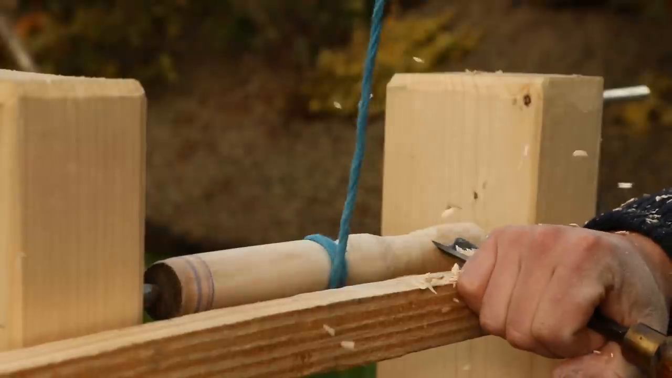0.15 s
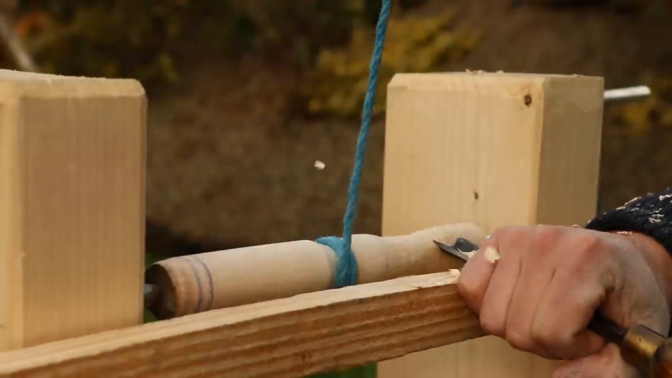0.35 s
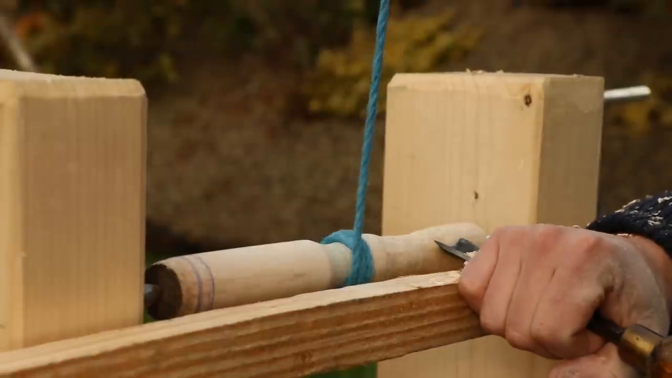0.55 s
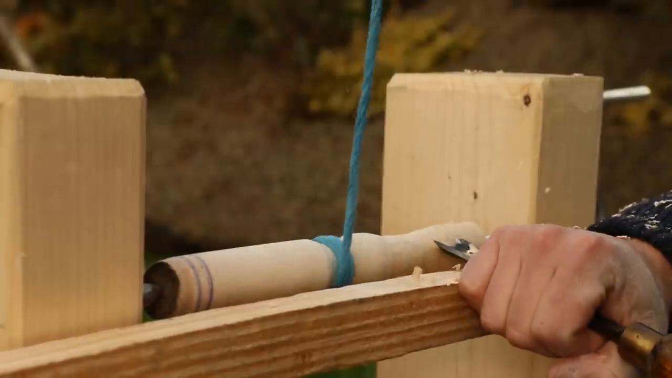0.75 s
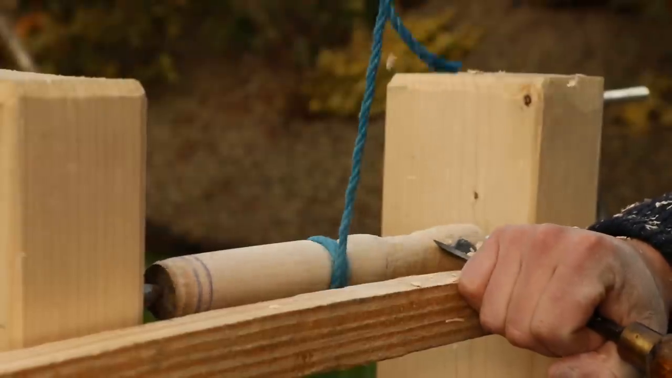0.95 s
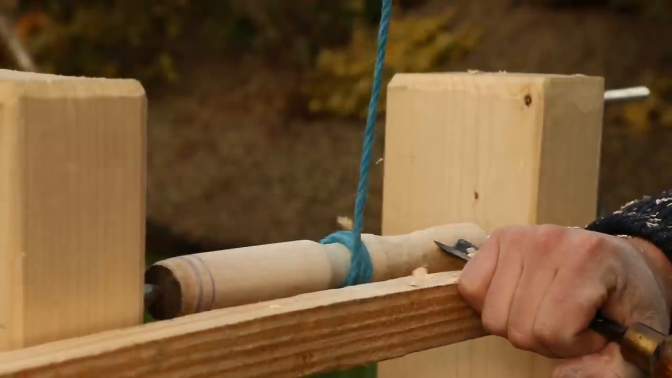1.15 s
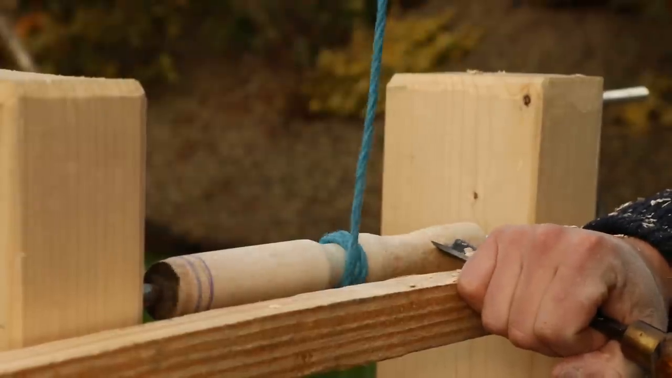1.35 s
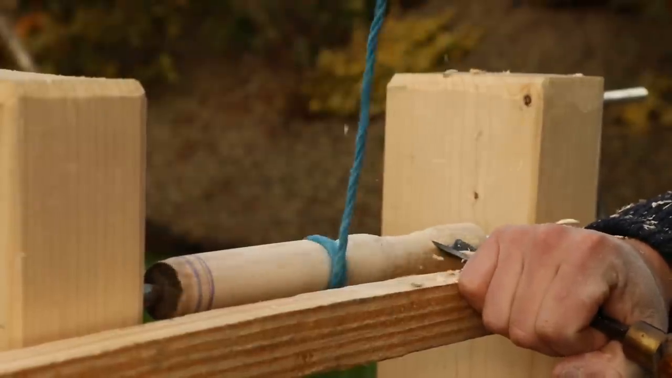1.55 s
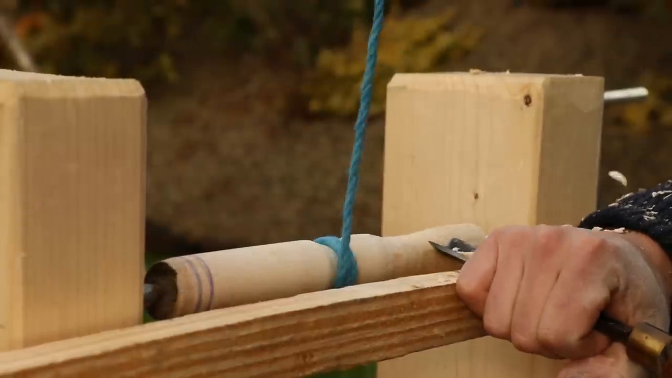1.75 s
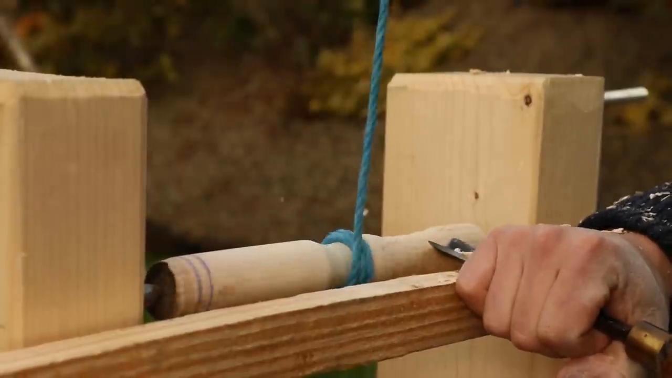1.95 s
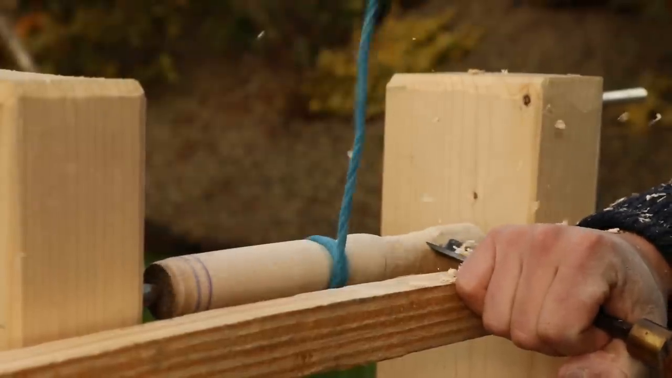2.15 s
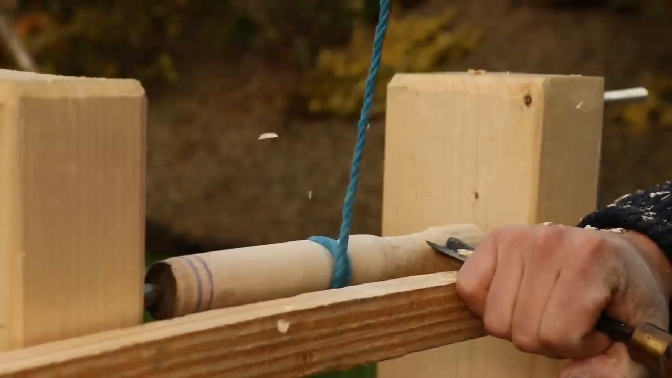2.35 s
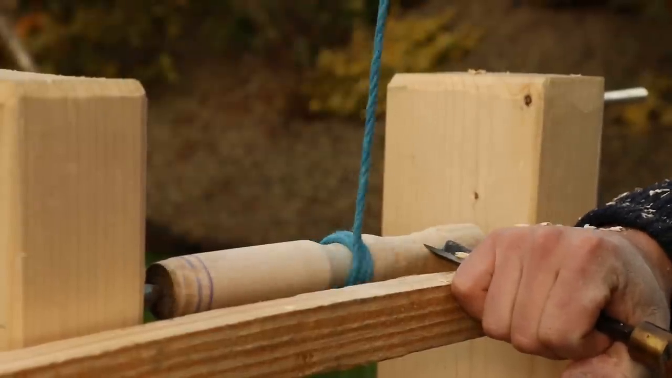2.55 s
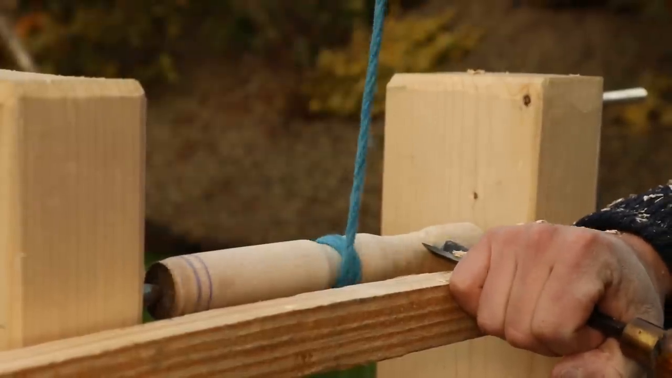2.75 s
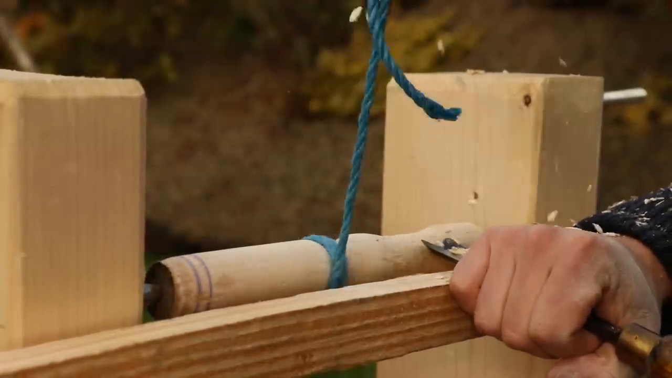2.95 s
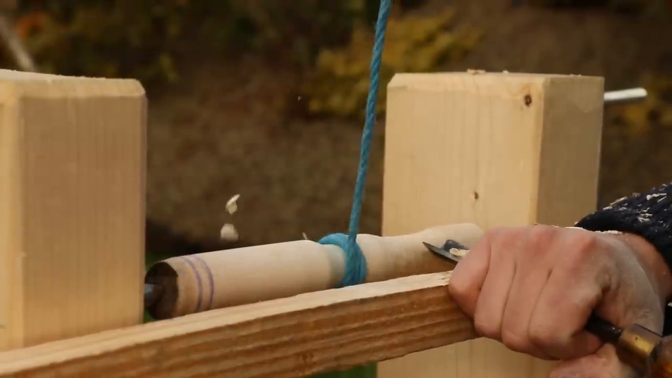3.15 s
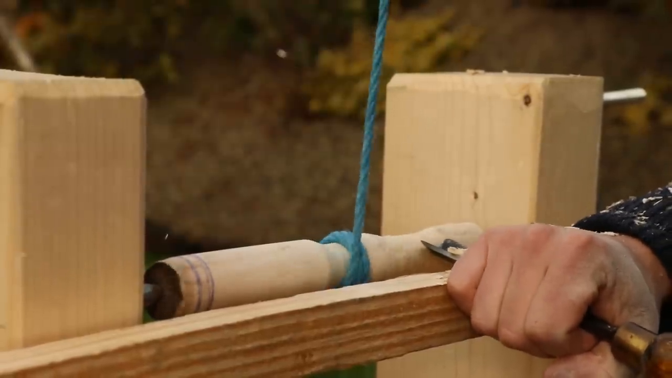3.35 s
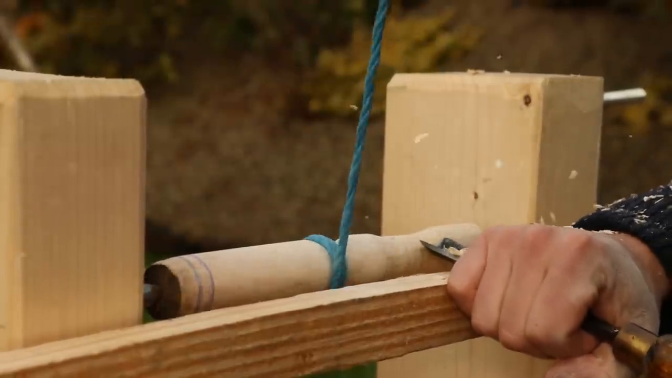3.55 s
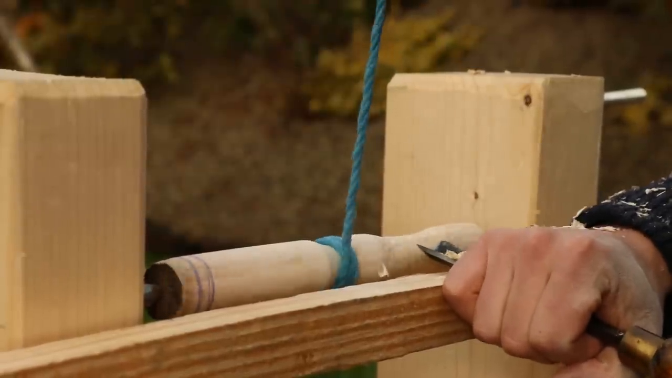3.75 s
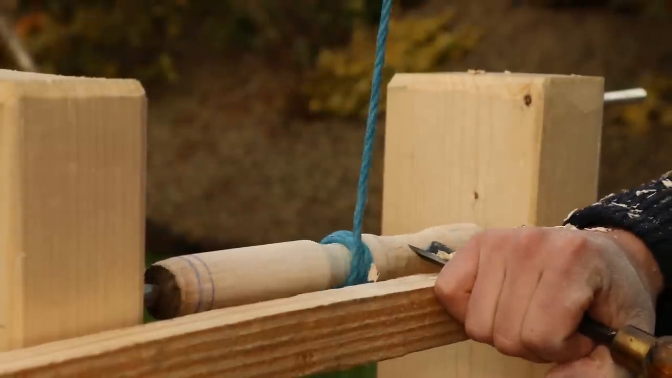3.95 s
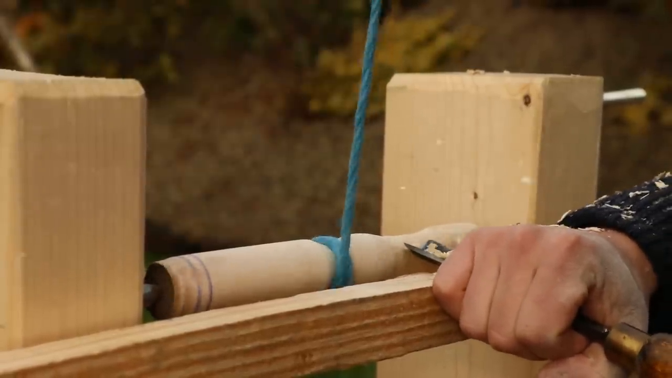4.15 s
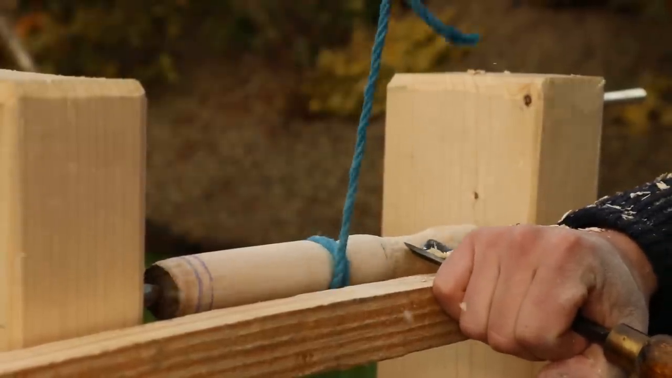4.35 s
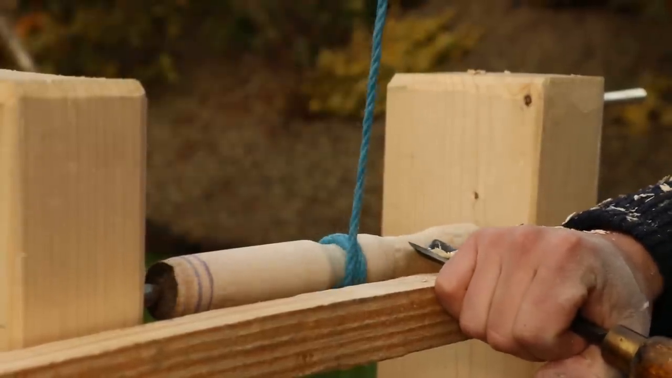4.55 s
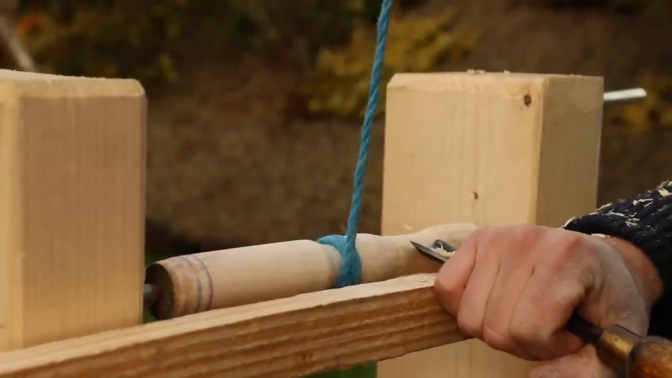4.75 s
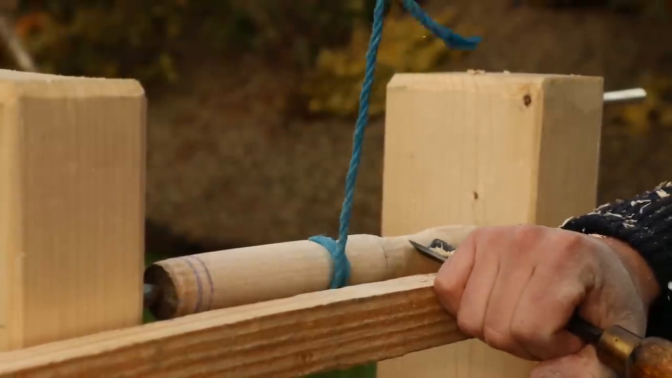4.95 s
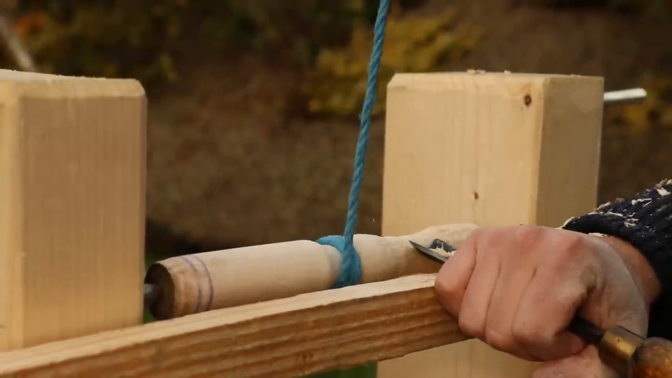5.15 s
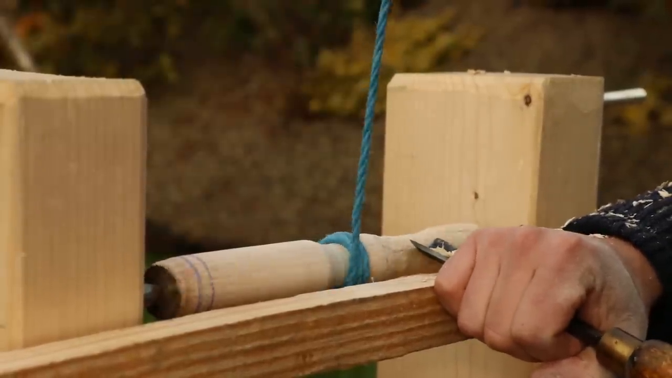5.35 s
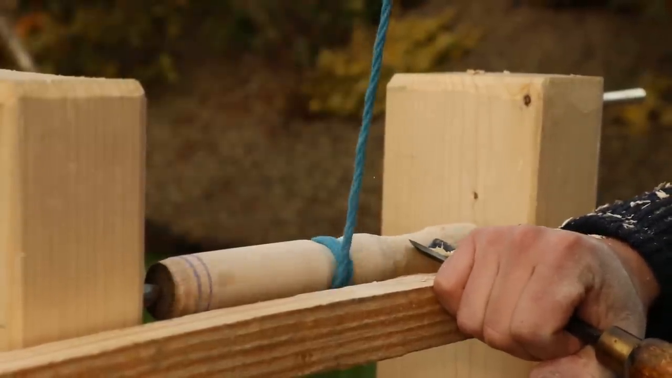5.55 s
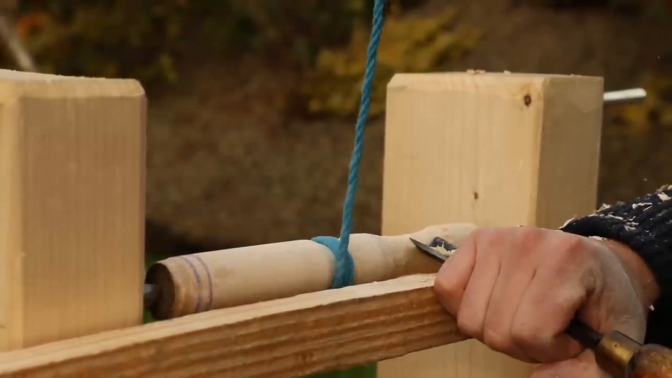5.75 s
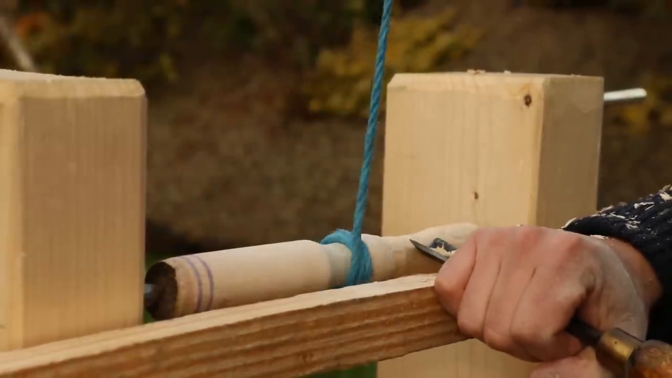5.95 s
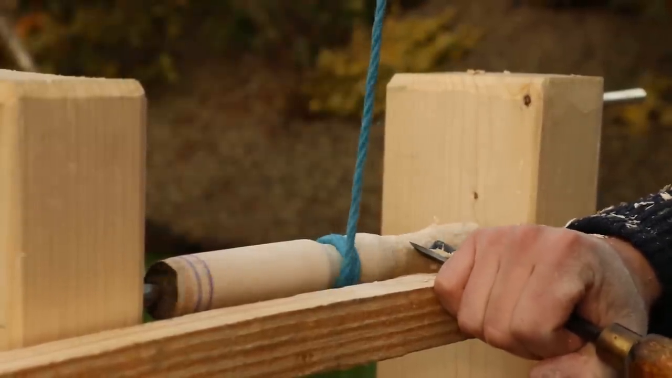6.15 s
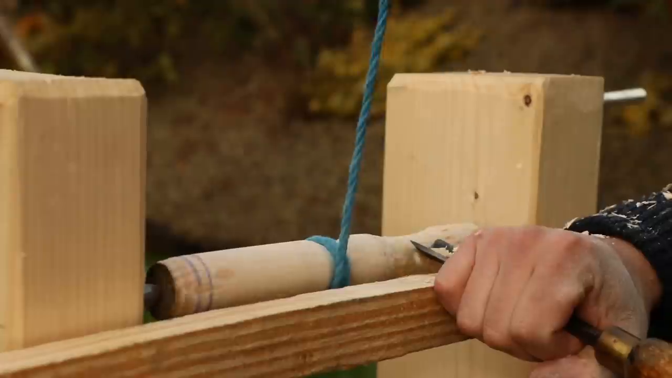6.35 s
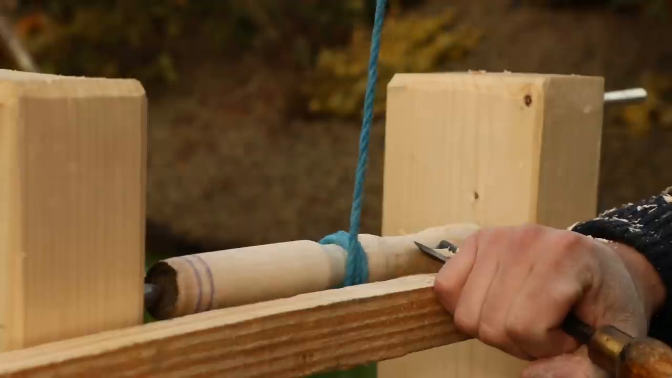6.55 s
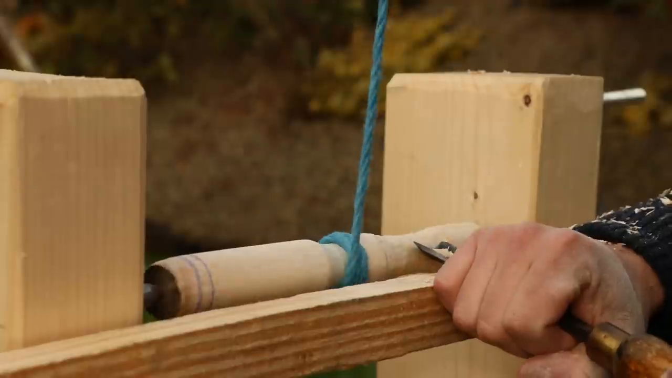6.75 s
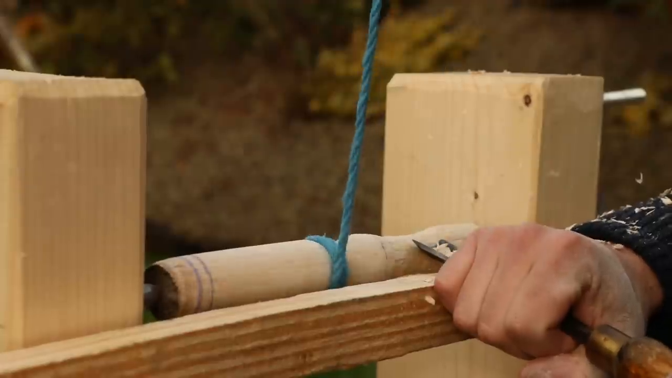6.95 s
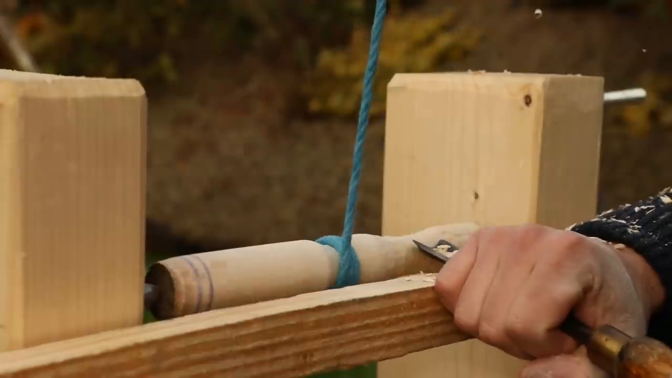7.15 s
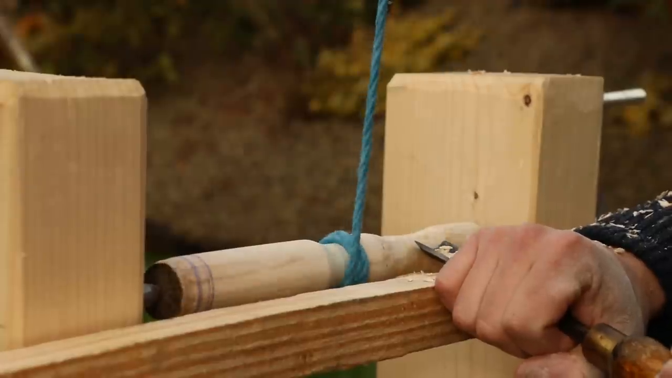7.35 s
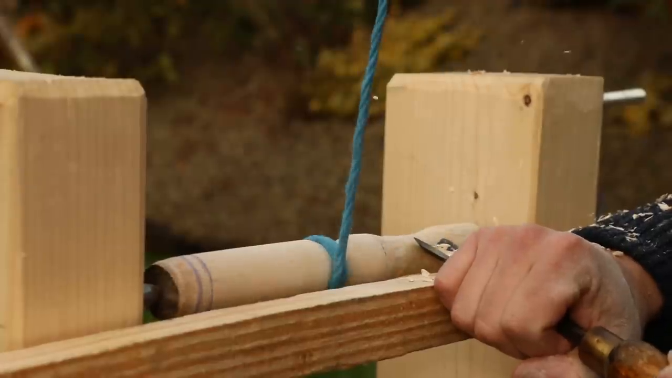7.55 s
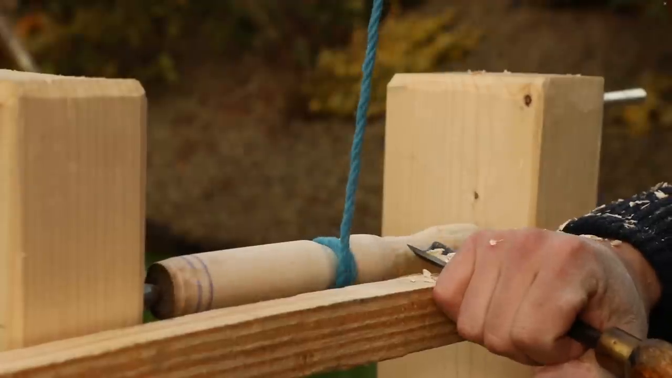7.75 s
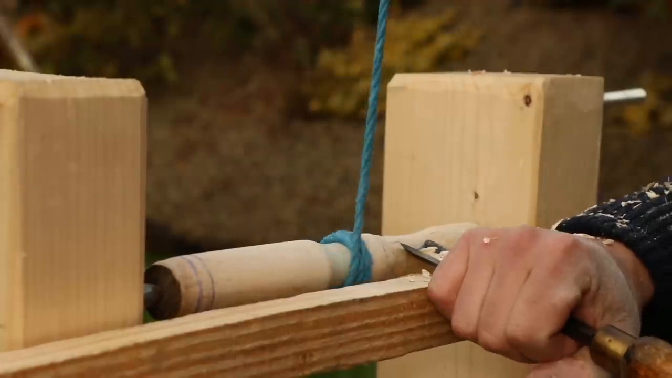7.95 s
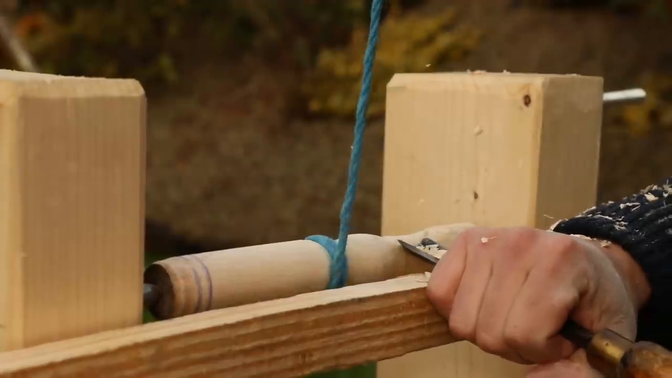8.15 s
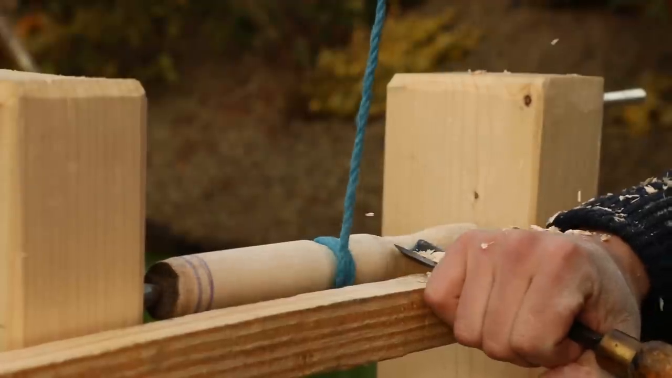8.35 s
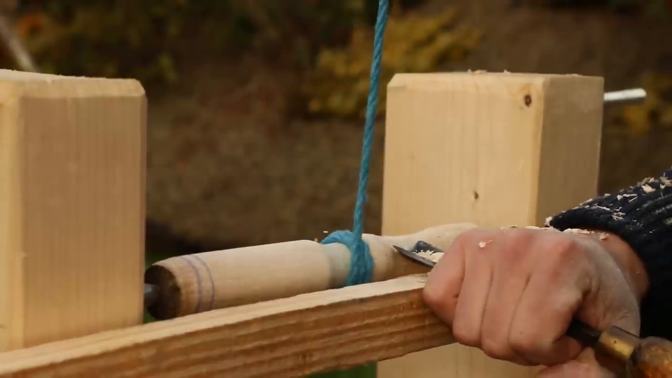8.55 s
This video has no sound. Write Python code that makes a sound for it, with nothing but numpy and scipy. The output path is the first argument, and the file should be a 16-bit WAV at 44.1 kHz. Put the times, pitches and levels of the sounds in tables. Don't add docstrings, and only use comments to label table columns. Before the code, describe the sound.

Close outdoors, a steel gouge cuts a wooden spindle driven back and forth by a cord. Every two-thirds of a second a harsh, grainy scrape bites with woody knocks and bright hissing chips, then stops abruptly. Between cuts the spindle runs back with a much quieter rumble, cord rustle and small bumps. Early strokes are strongest; middle ones thin to a hiss, later ones partly recover. Dry, almost echo-free, over faint air.

```python
import sys
import numpy as np
from scipy import signal
from scipy.fft import rfft, irfft
from scipy.io import wavfile

SR = 44100
rng = np.random.default_rng(int(sys.argv[2]) if len(sys.argv) > 2 else 0)


def invert_db(level):
    return 10 ** (np.asarray(level, dtype=float) / 20)


def materialize(psi):
    bounded = np.clip(np.atleast_2d(psi).T, -1, 1)
    quanta = np.round(bounded * 32767).astype(np.int16)
    wavfile.write(sys.argv[1], SR, quanta)


N = 378819

# last slip in s, slowing in s, nearness to rest,
# level in dB, fade in dB per earlier slip.
SLOWINGS = [
    (3.731, .012, 0.21, -36, 1),
    (4.4198, .014, 0.3, -33, .7),
    (5.7642, .015, 0.15, -31, .8),
    (5.026, .018, .7, -29, .5),
]
LIFT_S = 0.0011


def rms_one(x):
    return x / np.sqrt(np.mean(x ** 2) + 1e-20)


def in_time(rows):
    s, *columns = np.transpose(rows)
    return [np.interp(np.arange(N) / SR, s, c) for c in columns]


def drift(rate_hz):
    r = np.exp(-32 * np.pi * rate_hz / SR)
    noise = rng.standard_normal(N // 16 + 2002)
    slow = signal.lfilter([1], [1, -2 * r, r * r], noise)[2000:]
    return np.interp(np.arange(N) / 16, np.arange(len(slow)), rms_one(slow))


def body(force, modes, patchy_db, wander_db=0):
    probe = np.zeros(SR // 4)
    probe[0] = 1
    out = 0
    for k, (hz, width_hz, level_db) in enumerate(modes):
        r = np.exp(-np.pi * width_hz / SR)
        uneven = invert_db(patchy_db * drift(42.0) + wander_db * drift(2.5))
        fed = np.concatenate([probe, force * uneven + 1e-18])
        ringing = signal.lfilter([1, 0, -1], [1, -2 * r * np.cos(2 * np.pi * hz / SR), r * r], fed)
        out = out + (-1) ** k * invert_db(level_db) * (1 - r * r) / 2 * ringing
    return out[len(probe):] / np.sqrt(np.sum(out[:len(probe)] ** 2))


def fibres(per_s, spread_db, clumps):
    sizes = invert_db(spread_db * np.minimum(rng.exponential(1, N), 5)) * rng.choice([-1, 1], N)
    return rms_one(sizes * (rng.random(N) < per_s / SR) * clumps)


def bursts(start_s, level_db, rise_s, dying_s):
    starts = np.zeros(N)
    starts[[max(round((s - rise_s) * SR), 0) for s in start_s]] = invert_db(level_db)
    t = np.arange(SR // 8) / SR
    shape = (1 - np.exp(-t / rise_s)) * invert_db(-60 * t / dying_s)
    return np.abs(signal.fftconvolve(starts, shape)[:N])


def air():
    # frequency in Hz, density in dB per Hz.
    hush = np.array([(20, -16), (60, -19), (160, -7), (600, 3), (1600, -4), (2500, -22), (5000, -31),
                     (16000, -33)])
    hz = np.maximum(np.arange(N // 2 + 1) * SR / N, 1)
    colour = invert_db(np.interp(np.log(hz), np.log(hush[:, 0]), hush[:, 1]))
    return invert_db(-58.0) * rms_one(irfft(rfft(rng.standard_normal(N)) * colour, N))


def moving():
    # rubbing is back at s, length of the dip in s, depth in dB.
    rests = [(1.428, 0.016, -22), (1.545, 0.044, -15.5), (2.126, 0.032, -14), (2.83, 0.12, -8.5),
             (3.456, 0.055, -26), (4.156, 0.11, -6.5), (4.775, 0.078, -15), (5.51, 0.054, -8),
             (6.16, 0.042, -9), (6.828, 0.06, -9), (7.442, 0.024, -15), (7.785, 0.058, -16),
             (8.401, 0.028, -12)]
    t = np.arange(N) / SR
    dips_db = [np.interp(t, [s - span, s - span / 2, s - .002, s], [0, db, db, 0]) for s, span, db in rests]
    return invert_db(sum(dips_db))


def arch(start, top, end):
    return np.sin(np.pi / 2 * np.interp(np.arange(N) / SR, [start, top, end], [0, 1, 0]))


def contact():
    # start, fastest and stop in s, wood and edge hiss in dB.
    returns = [(-0.20, -0.032, 0.065, -48.5, -67), (0.37, 0.578, 0.74, -40.5, -61),
               (1.013, 1.214, 1.424, -41.5, -57.5), (1.675, 2.085, 2.41, -40.5, -58.5),
               (2.411, 2.594, 2.91, -44.5, -62), (3.06, 3.247, 3.58, -43.5, -59.5),
               (3.728, 3.925, 4.11, -43.5, -59.5), (4.424, 4.56, 4.76, -47, -63.5),
               (5.055, 5.164, 5.45, -46, -65), (5.765, 5.954, 6.15, -44.5, -61),
               (6.445, 6.557, 6.78, -43, -60), (7.058, 7.347, 7.4, -41.5, -63),
               (7.736, 7.967, 8.07, -44, -63.5), (8.37, 8.562, 8.83, -43, -60.5)]
    # enters, deepest and leaves in s, wood and edge hiss in dB.
    pushes = [(0.09, 0.173, 0.36, -20.5, -34.5), (0.734, 0.879, 1.019, -19.5, -41),
              (1.412, 1.556, 1.703, -17.5, -38), (2.102, 2.219, 2.392, -18, -35),
              (2.807, 2.883, 3.065, -16.5, -32.5), (3.458, 3.547, 3.71, -23, -35.5),
              (4.131, 4.195, 4.405, -29, -34), (4.789, 4.905, 5.03, -35.5, -42.5),
              (5.514, 5.606, 5.77, -36, -43), (6.139, 6.294, 6.413, -27.5, -35.5),
              (6.816, 6.971, 7.036, -27, -37), (7.43, 7.565, 7.715, -31.5, -40),
              (8.061, 8.194, 8.335, -28.5, -36.5)]
    # time in s, change of wood and edge in dB.
    eases = [(0.263, -2, -4), (0.965, -3, -8), (1.635, 0, -1.5), (2.36, -7, -4), (2.96, -3, -7),
             (3.637, -3.5, -17), (4.302, -4.5, -7), (5.03, -2, 7), (5.76, 0, 8), (6.355, -6.5, -10),
             (7.035, 3, 11), (7.62, -3.5, -11), (8.258, -5, -7.5)]
    graze_wood_db, graze_edge_db = -49, -58
    still_wood_db, still_edge_db = -65, -70.5
    enter_s, coast_s, ease_s = 0.043, 0.033, 0.003
    drag_s, drag_db = .1, -55
    t = np.arange(N) / SR
    spindle, frame, steel, chips, cord = invert_db([still_wood_db] * 2 + [still_edge_db] * 3)
    for (start, top, end, wood_db, edge_db), (at_s, ease_wood_db, ease_edge_db) in zip(pushes, eases):
        eased = np.interp(t, [at_s - ease_s / 2, at_s + ease_s / 2], [0, 1])
        pressing = np.interp(t, [start, start + enter_s, end, end + coast_s], [0, 1, 1, 0])
        shaving = np.interp(t, [start, start + enter_s, end - LIFT_S, end], [0, 1, 1, 0])
        wood_depth = arch(start, top, end + coast_s) ** 0.9
        edge_depth = arch(start, top, end) ** 0.51
        cut_db = graze_wood_db + (wood_db - graze_wood_db) * wood_depth + ease_wood_db * eased
        hiss_db = graze_edge_db + (edge_db - graze_edge_db) * edge_depth + ease_edge_db * eased
        frame = frame + pressing * invert_db(cut_db)
        spindle = spindle + pressing * invert_db(-18 + 0.88 * (cut_db + 18))
        steel = steel + shaving * invert_db(hiss_db)
        chips = chips + shaving * invert_db(-43 + 0.88 * (hiss_db + 35))
    for start, top, end, wood_db, edge_db in returns:
        speed = arch(start, top, end)
        wood_rub, edge_rub = speed ** .7, speed ** .4
        frame = frame + invert_db(wood_db) * wood_rub
        spindle = spindle + invert_db(wood_db + 3.5) * wood_rub
        steel = steel + invert_db(edge_db - 4) * edge_rub
        cord = cord + invert_db(edge_db - 3.5) * edge_rub
    for last_s, *_ in SLOWINGS:
        drag_times = [last_s - drag_s, last_s - drag_s / 2, last_s, last_s + LIFT_S]
        drag = invert_db(drag_db) * np.interp(t, drag_times, [0, 1, 1, 0])
        steel, chips = steel + drag, chips + drag / 2
    return 20 * np.log10([spindle, frame, steel, chips, cord])


def grain(loaded):
    felt = RETURN_GRAIN = .4 + 0.38 * loaded
    chatter_db = felt * (1.3 * drift(21.0) + 3.53 * drift(314))
    ridges_per_s = 70 * invert_db(1.4 * drift(13.5))
    return chatter_db + 1.5 * loaded * np.cos(2 * np.pi * np.cumsum(ridges_per_s) / SR)


def edge_blows():
    # time in s, frame level, steel share and spindle level in dB.
    bites = [(0.164, 1, -36.5, 0), (0.1922, 1, -31, -26), (0.216, -11.5, -9, -28), (0.247, -4, -14, 0),
             (4.897, -21.5, 2.5, -12.5), (0.8152, -15, -9, -3), (0.841, 2.5, -24, 2),
             (3.521, -6.5, -29, -6), (1.469, -12.5, -10.5, -8.5), (1.489, -7.5, -21, -0.5),
             (1.548, -5.5, -10, -15), (1.601, 3, -33, -4), (1.659, -35, -13, -42), (2.191, -10, -13, -45),
             (2.223, -3.5, -31, -26), (2.863, -2.5, -14, -24), (2.902, 3.5, -23, -2.5),
             (2.9855, -8.5, -24, -2.5), (3.5348, 1.5, -26, -2), (3.571, -2, -40, -23),
             (3.6087, -11.5, -23, -18), (4.2771, -12.5, -1.5, -18), (6.2736, -10.5, -10, -18),
             (6.3202, -2, -16, -8.5), (6.9042, -7.5, -14, -6.5), (6.9542, -9, -24, -5),
             (7.006, -7, -12.5, -5.5), (7.545, -8.5, -30, -5.5), (8.1468, -6, -24, -11),
             (8.198, -8.5, -8, -2)]
    touches = [(0.0516, -23, -7, -53.5), (0.1224, -2.5, -39, -5.5), (0.78, -15, -33, -12),
               (1.4275, -21.5, -24, -28), (2.126, -23, -23, -34), (2.834, -8, -17, -11.5),
               (3.485, -12.5, -11, -12), (4.163, -33, -29, -12.5), (4.829, -31, -10, -53),
               (5.5713, -12, -8, -25), (6.1652, -27.5, -13, -51), (6.83, -29.5, -8, -33),
               (8.087, -19, -11, -17.5), (8.13, -14, -18, -13)]
    bumps = [(0.34, -20, -10, -38), (0.431, -23, -16, -16.5), (0.496, -14, -14, -10.5),
             (0.552, -13, -22, -12), (0.611, -15.5, -20, -13), (0.6775, -20, -16, -16),
             (1.063, -16, -24, -8.5), (1.179, -13.5, -16, -8), (1.399, -25, -13, -15),
             (2.014, -17.5, -13, -12), (2.674, -43, -25, -13.5), (3.3484, -23.5, -33, -15),
             (5.1288, -21, -14, -23), (5.242, -24.5, -13.5, -14.5), (5.924, -37, -32, -12),
             (5.98, -41, -25, -13.5), (6.562, -25, -27, -13.5), (6.629, -52, -27, -15),
             (6.696, -31, -29, -12.5), (7.112, -27, -5, -49), (7.178, -41, -28, -39),
             (4.495, -23.5, -15.5, -42), (6.25, -18, -22, -34), (7.254, -20, -25, -14),
             (7.855, -32, -25, -19), (7.982, -23, -13, -26), (8.25, -36, 13.5, -10),
             (8.473, -30, -29, -13.5), (8.558, -30, -8, -11)]
    # time in s, peak, steel share and spindle share in
    # dB.
    catches = [(0.1507, -4, -9, -18), (0.2314, -18, -15, -12), (0.2788, -5.5, -16, -2),
               (0.7936, -12, -15, -5), (0.892, -4, -22, -10), (1.5674, -3, -15, -4), (1.5903, -10, -15, -7),
               (1.6117, 0, -12, -10), (2.1395, -8, -17, -14), (2.1487, -8, -19, -10),
               (2.2493, -13, -15, -12), (2.2783, -10, -10, -12), (2.3116, -7, -15, -15),
               (2.3441, -26, -18, -7), (2.925, -7, -20, -15), (2.9454, -19, -17, -12), (3.004, -8, -7, -7),
               (3.051, -15, -9, -23), (3.503, -9, -15, -8), (3.6267, -8, -4, -9), (4.177, -14, -19, -12),
               (4.1913, -4.5, -13, -22), (4.2194, -23, -15, -14), (4.2434, -18, -13, -12),
               (4.2917, -12, -7, -15), (4.9327, -24, -15, -12), (6.1876, -18, -17, -15),
               (6.3444, -25, -15, -15), (6.8593, -25, -13, -9), (7.2868, -19, -12, -9),
               (7.5078, -28, -15, -10), (7.5324, -15, -21, -4), (7.574, -10, -13, -7),
               (7.5894, -18, -15, -12), (8.0995, -25, -15, -14), (8.1718, -7, -15, -9),
               (0.855, -5, -13, -10), (0.9174, -4, -15, -16), (0.9644, -8, -12, -10), (2.8744, -3, -13, -8),
              (2.9114, 0, -15, -10), (5.2126, -27, -15, -10), (6.9197, -6, -10, -10),
              (6.968, -12, -13, -12), (7.019, -14, -15, -4), (7.2441, -24, -13, -10)]
    catch_db = -6.5
    further = [(s, db + catch_db, steel_db, db + share_db) for s, db, steel_db, share_db in catches]
    return np.array(bites + touches + bumps + further).T


def ring_spindle(coarse, crush, loaded, rubbing, spindle_db, blow_s, knock_db):
    # frequency in Hz, width in Hz, level in dB.
    free_modes = [(159, 43, -25.5), (279, 41.4, -10), (405, 133, -17.5), (457, 93, -9.5), (516, 44.7, 4),
                  (598.3, 52.7, 2.5), (701, 80, -6), (710, 140, -26)]
    loaded_modes = [(138, 33, -32), (285, 21, -10), (378, 76.5, -8), (426, 51.5, -4.5), (532, 25, -13),
                    (579, 21.5, -6.5), (675, 52, 2.5), (841, 94, -2.5)]
    # time in s, peak in dB.
    jolts = np.array([(1.261, -28), (1.872, -33), (2.462, -37.5), (2.541, -34.5), (2.626, -30.5),
                      (2.746, -40), (3.098, -35.5), (3.165, -32), (3.243, -28.5), (3.296, -29), (3.78, -41),
                      (3.821, -29.5), (3.849, -35), (3.88, -31.5), (3.909, -43), (3.941, -33), (3.977, -36),
                      (4.017, -36.5), (4.043, -30), (4.339, -28.5), (4.508, -37), (4.542, -32),
                      (5.138, -27), (5.628, -26.5), (5.697, -26.5), (5.897, -30.5), (6.49, -42.5),
                      (7.477, -30), (7.88, -33), (7.912, -30), (8.501, -31.5)])
    knock_lag_s = 0.0044
    lumps = invert_db(2.1 * (1 - loaded) * drift(41))
    push = coarse * lumps * invert_db(spindle_db - 2.5) * rubbing ** 0.37
    push += crush * bursts(blow_s + knock_lag_s, knock_db - 5.0, rise_s=0.0074, dying_s=0.051)
    push += crush * bursts(jolts[:, 0], jolts[:, 1] + 4, rise_s=0.0055, dying_s=0.062)
    free = body(push * np.sqrt(1 - loaded), free_modes, patchy_db=2.5)
    return free + body(push * np.sqrt(loaded), loaded_modes, patchy_db=1.0)


def ring_frame(coarse, snaps, crush, loaded, rubbing, frame_db, blow_s, peak_db):
    # frequency in Hz, width in Hz, level in dB.
    frame_modes = [(996, 52, 2.5), (1212, 156, -2.5), (1339, 63.4, 3.5), (1516, 63, 3.5), (1686, 115, -0.5),
                   (1964, 168, -2.5), (2140, 102, -3), (2392, 130, -3.5), (2653, 220, -1.5),
                   (2765, 264, -1), (3018, 413, -7.5), (3230, 1120, -20)]
    softened = rms_one(signal.lfilter([1], [1, -.72], coarse))
    dulled = loaded * coarse + 0.46 * (1 - loaded) * softened
    force = np.zeros(N)
    force[np.round(blow_s * SR).astype(int)] = invert_db(peak_db + 5.5) * np.cos(np.pi * np.arange(len(blow_s)))
    force += (dulled + invert_db(-1.5) * snaps) * np.sqrt(rubbing) * invert_db(frame_db - 2.5)
    force += crush * bursts(blow_s, peak_db - 8.0, rise_s=0.0013, dying_s=0.033)
    return body(force, frame_modes, patchy_db=2.0)


def ring_rest(coarse, loaded, frame_db):
    # frequency in Hz, width in Hz, level in dB.
    rest_modes = [(1020, 33, -4.5), (1366, 26, 0.5), (1587, 40, 2.5), (2052, 48, -2), (2597, 39, -9),
                  (3586, 57, -15.5)]
    return body(coarse * (1 - loaded) * invert_db(frame_db - 6), rest_modes, patchy_db=3.5, wander_db=2.5)


def ring_steel(fine, snaps, scratch, loaded, rubbing, steel_db):
    # frequency in Hz, width in Hz, level in dB.
    steel_modes = [(3563, 186, 7.5), (3967, 210, 5), (4530, 108, 4), (4780, 114, -1), (5420, 410, -5.5),
                   (5580, 250, -2.5), (6170, 88, -2.5)]
    flute_modes = [(6940, 560, 3), (7620, 680, -9.5)]
    # push in s, level against the steel in dB.
    grip = [(0.17, 0.5), (0.87, 1.7), (1.56, -0.5), (2.22, 0.3), (2.88, 1), (3.54, 1), (4.2, -0.5),
            (4.92, -2.5), (5.6, -1.5), (6.28, 0.5), (6.97, -3), (7.55, -5.5), (8.19, -1)]
    shearing = (fine + invert_db(-6) * snaps) * rubbing * invert_db(steel_db - 4.0) + 0.79 * scratch
    flute = body(shearing * invert_db(in_time(grip)[0] - 4.0), flute_modes, patchy_db=2.2 * loaded)
    return flute + body(shearing, steel_modes, patchy_db=2.47 * loaded, wander_db=1.2)


def chip_hiss(chatter_db, scratch, loaded, rubbing, chip_db):
    # frequency in Hz, width in Hz, level in dB.
    chip_modes = [(8460, 640, -8.5), (9040, 740, 2), (9940, 390, 3.5), (10070, 1500, 0.5),
                  (11350, 700, -0.5), (12500, 800, -11), (13900, 700, -16)]
    breaking = fibres(per_s=17000, spread_db=5.5, clumps=invert_db(chatter_db))
    force = breaking * rubbing * invert_db(chip_db - 5.0) + invert_db(-11.5) * scratch
    return body(force, chip_modes, patchy_db=2.8 * loaded)


def cord_rustle(chatter_db, rubbing, cord_db):
    # frequency in Hz, width in Hz, level in dB.
    cord_modes = [(3680, 400, 7), (5060, 480, -2.5), (5850, 560, -1), (7500, 460, 2.5), (10550, 1700, 1.5),
                  (14300, 2500, -18)]
    rub = fibres(per_s=11000, spread_db=5.0, clumps=invert_db(0.64 * chatter_db))
    return body(rub * rubbing * invert_db(cord_db), cord_modes, patchy_db=1.0)


def gouge():
    spindle_db, frame_db, steel_db, chip_db, cord_db = contact()
    blow_s, peak_db, steel_share_db, knock_db = edge_blows()
    loaded = 1 / (1 + np.exp((-38.5 - frame_db) / 8))
    rubbing = moving()
    chatter_db = grain(loaded)
    coarse = fibres(per_s=6000, spread_db=2.5, clumps=invert_db(chatter_db))
    fine = fibres(per_s=9000, spread_db=4.0, clumps=invert_db(1.59 * chatter_db))
    crush = fibres(per_s=9800, spread_db=2.0, clumps=invert_db(0.75 * drift(190)))
    snaps = loaded * fibres(per_s=450, spread_db=6.0, clumps=invert_db(chatter_db))
    scratch = crush * bursts(blow_s, peak_db + steel_share_db - 2.5, rise_s=0.00074, dying_s=0.014)
    cut = ring_spindle(coarse, crush, loaded, rubbing, spindle_db, blow_s, knock_db)
    cut += ring_frame(coarse, snaps, crush, loaded, rubbing, frame_db, blow_s, peak_db)
    cut += ring_rest(coarse, loaded, frame_db)
    cut += ring_steel(fine, snaps, scratch, loaded, rubbing, steel_db)
    cut += chip_hiss(chatter_db, scratch, loaded, rubbing, chip_db)
    dull = signal.sosfilt(signal.butter(2, 16000, fs=SR, output="sos"), cut)
    return dull + cord_rustle(chatter_db, rubbing, cord_db)


def ticks():
    # time in s, peak in dB.
    snap_events = [(0.0501, -32), (0.351, -40), (0.4309, -47), (0.495, -42), (0.5538, -40), (0.728, -35.5),
                   (1.022, -41), (1.0291, -43), (1.1633, -39), (1.3138, -36.5), (1.428, -51), (1.705, -42),
                   (2.0433, -34), (3.046, -35), (3.1904, -42), (3.3857, -37), (3.817, -44), (4.0341, -36),
                   (4.5695, -48), (5.695, -42.5), (5.703, -45), (5.944, -41), (6.1623, -43),
                   (6.3945, -35.5), (7.3893, -43), (7.6909, -45), (7.981, -34), (8.021, -37), (8.3402, -44),
                   (8.5485, -49)]
    further_snaps = [(0.4778, -40), (1.1009, -38), (1.3783, -49), (1.7539, -40), (1.939, -33), (3.6636, -29),
                     (3.8701, -37), (4.4558, -46), (4.4757, -52), (4.5092, -49), (4.5244, -49), (4.6199, -46),
                     (4.6902, -50), (4.7187, -51), (4.8015, -49), (6.119, -46), (6.5856, -36), (6.6393, -47),
                     (6.6977, -39), (6.719, -37), (6.7714, -49), (6.79, -52), (7.3294, -44), (7.3482, -42),
                     (7.3695, -37), (7.4409, -49), (7.7119, -43), (7.8894, -47), (7.9254, -42), (7.9443, -52),
                     (7.9608, -40), (7.9944, -35)]
    chance = (rng.random(N) < 12 / SR) * np.minimum(rng.exponential(1, N), 3)
    clicks = invert_db(-60) * moving() ** 2 * chance
    for events, gain_db in [(snap_events, 4.5), (further_snaps, -4.5)]:
        for s, peak_db in events:
            clicks[round(s * SR)] = invert_db(peak_db + gain_db)
    dying = invert_db(-60 / (0.01 * SR))
    bright = signal.lfilter([1], [1, -dying], clicks) * rng.standard_normal(N)
    return signal.sosfilt(signal.butter(2, [4500, 12500], "band", fs=SR, output="sos"), bright)


def squeaks():
    # time in s, pitch in Hz, level in dB.
    glides = [
        [(1.165, 4200, -57), (1.19, 4700, -50), (1.225, 4920, -51), (1.27, 4850, -64)],
        [(1.855, 3900, -59), (1.868, 4600, -51), (1.885, 4920, -53), (1.93, 4800, -63)],
        [(3.815, 4270, -62), (3.832, 4430, -50), (3.852, 4580, -51), (3.875, 4900, -64)],
        [(3.912, 3500, -60), (3.928, 3540, -47), (3.938, 3850, -51), (3.95, 3950, -62)],
    ]
    squeal = [(7.109, 640, -56), (7.114, 680, -45), (7.128, 984, -33), (7.138, 890, -50), (7.15, 870, -62)]
    out, t = np.zeros(N), np.arange(N) / SR
    waver = invert_db(5.0 * drift(70) - 5.5)
    for glide in glides:
        hz, level_db = in_time(glide)
        phase = 2 * np.pi * np.cumsum(hz * (1 + .03 * drift(250))) / SR
        out += waver * invert_db(level_db) * np.sin(phase) * (t > glide[0][0]) * (t < glide[-1][0])
    hz, level_db = in_time(squeal)
    phase = 2 * np.pi * np.cumsum(hz * (1 + .02 * drift(300))) / SR
    overtones = sum(np.cos(k * phase) * k ** -1.3 for k in range(1, 13))
    return out + invert_db(level_db) * overtones * (t > squeal[0][0]) * (t < squeal[-1][0])


def creaks():
    # frequency in Hz, width in Hz, level in dB.
    slip_modes = [(2020, 420, 5), (4200, 180, 2), (7600, 870, -10), (11100, 960, -5.5), (12500, 1200, -13)]
    slip_s = .004
    slips, earlier = np.zeros(N), np.arange(14)
    for last_s, slowing_s, near, level_db, fade_db in SLOWINGS:
        at_s = last_s - slowing_s * (np.sqrt(earlier + near) - np.sqrt(near))
        uneven_db = rng.normal(0, 1, len(earlier))
        slips[np.round(at_s * SR).astype(int)] = invert_db(level_db + 2.0 - fade_db * earlier + uneven_db)
    force = signal.lfilter([1], [1, -invert_db(-60 / (slip_s * SR))], slips) * rng.standard_normal(N)
    return body(force, slip_modes, patchy_db=1.5)


def scene():
    lathe = gouge() + ticks() + squeaks() + creaks()
    echo = signal.lfilter([.3], [1, -.7], np.roll(lathe, round(0.0055 * SR)))
    no_bass = signal.butter(4, 110, "high", fs=SR, output="sos")
    heard = signal.sosfilt(no_bass, lathe + invert_db(-14.5) * echo)
    return (air() + heard)[None]


def low_pass(x):
    return signal.sosfilt(signal.butter(12, 16660, fs=SR, output="sos"), x)


def record(dry):
    rounded = 1.8 * np.tanh(dry / 1.8)
    top_cut = signal.ellip(10, .5, 55, 15620, fs=SR, output="sos")
    return low_pass(signal.sosfilt(top_cut, rounded))


dry = scene()
out = record(dry)
materialize(out)
```